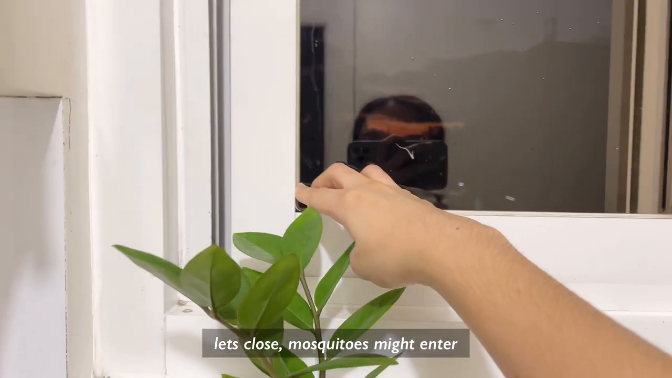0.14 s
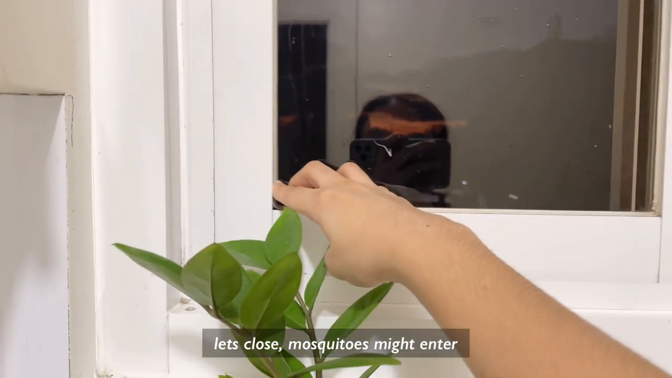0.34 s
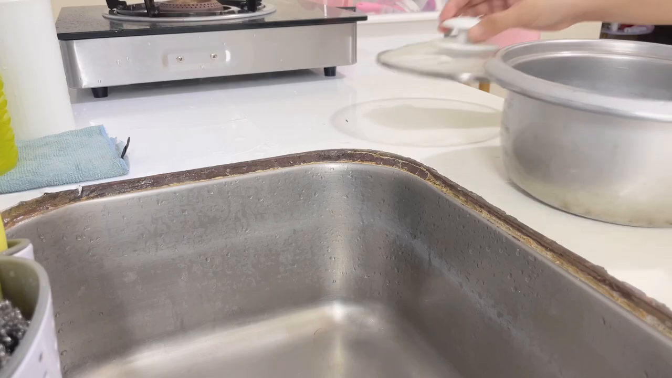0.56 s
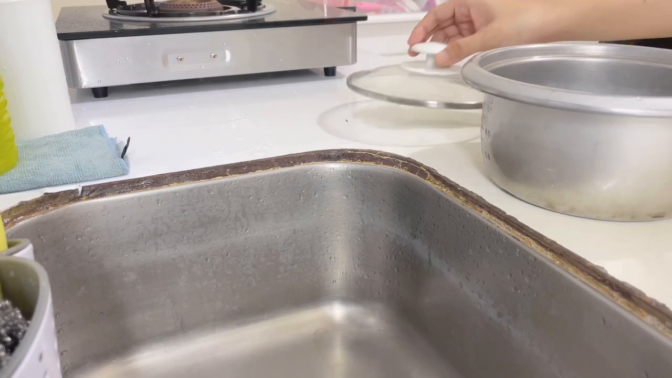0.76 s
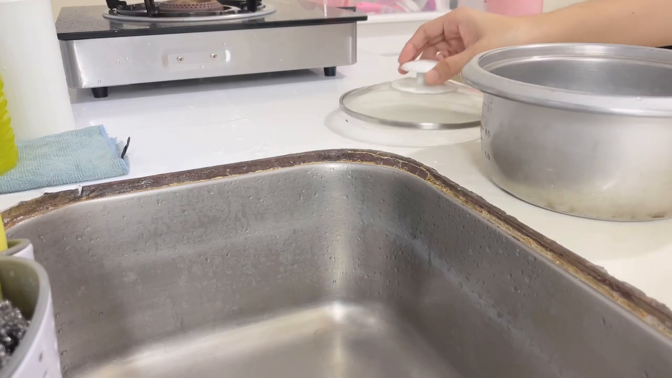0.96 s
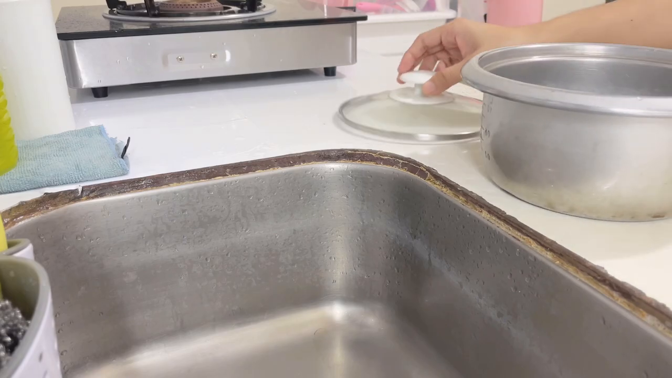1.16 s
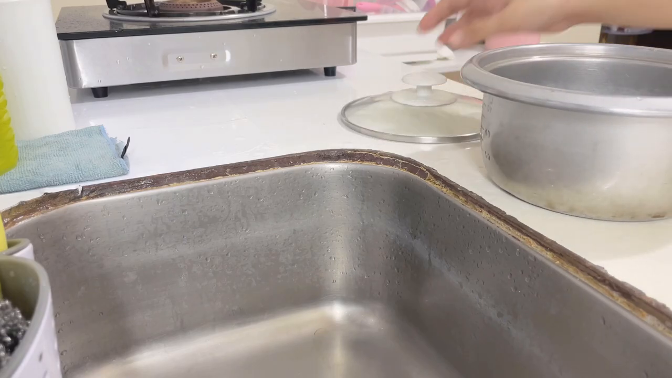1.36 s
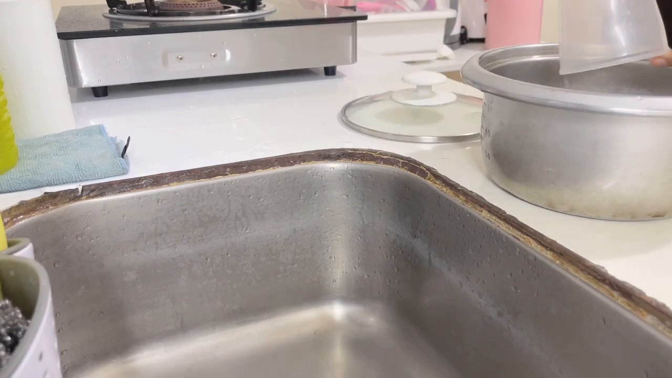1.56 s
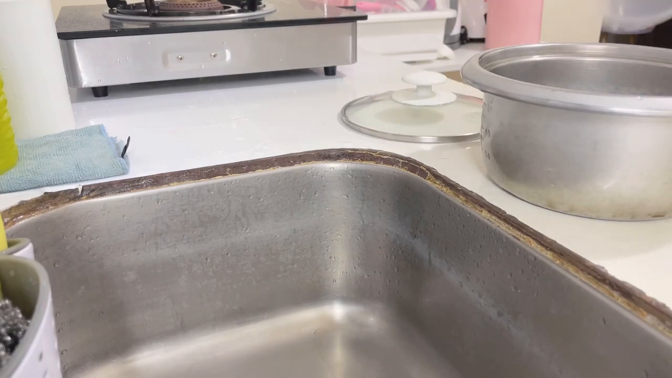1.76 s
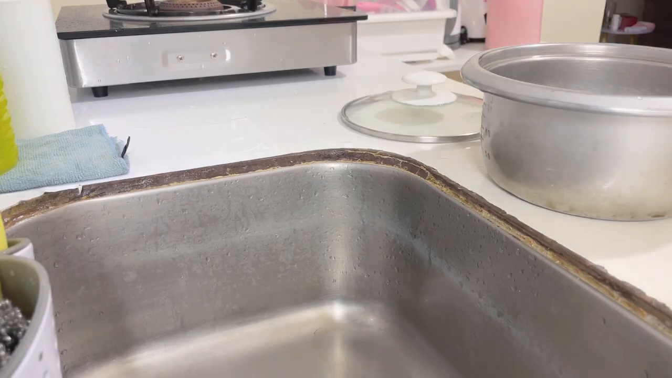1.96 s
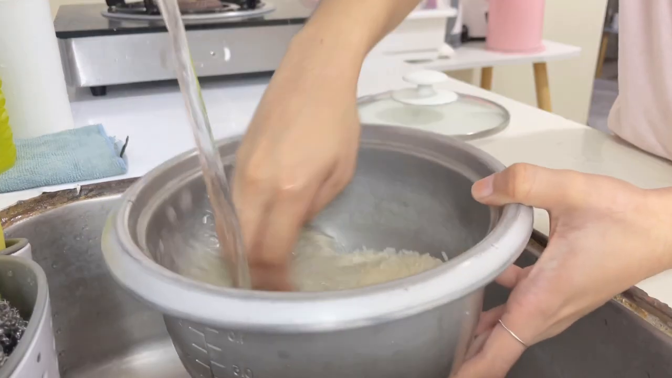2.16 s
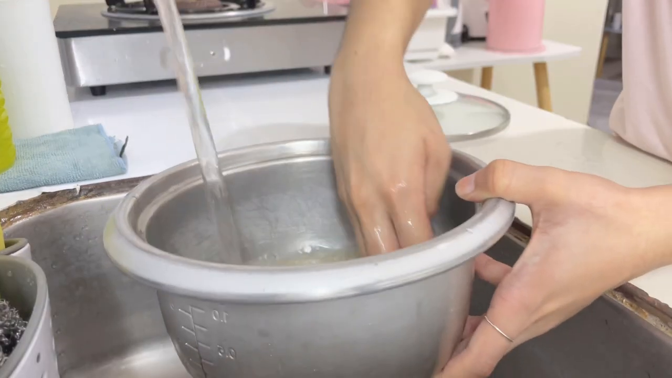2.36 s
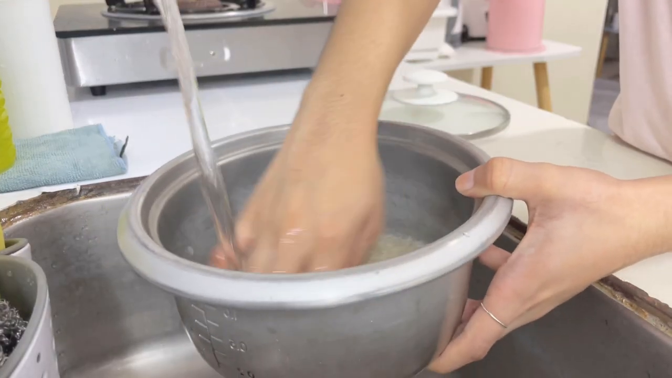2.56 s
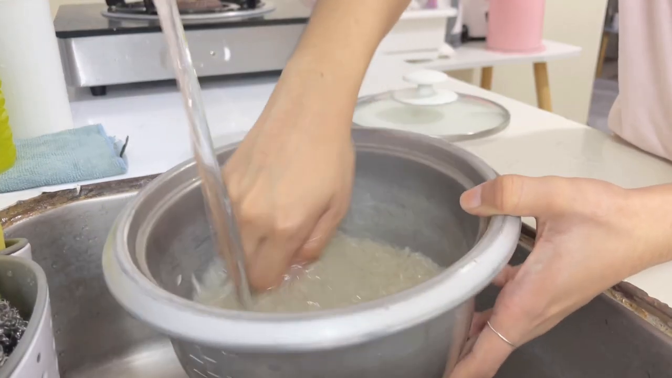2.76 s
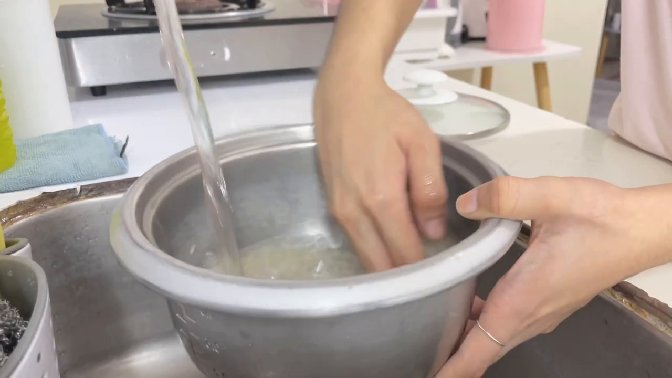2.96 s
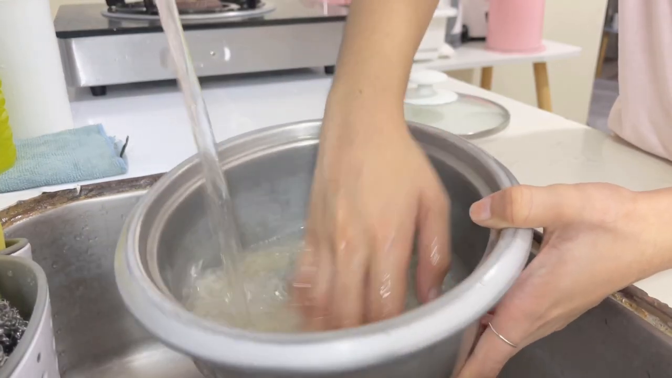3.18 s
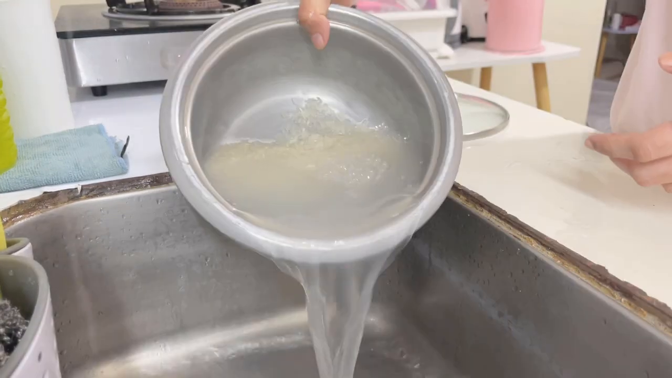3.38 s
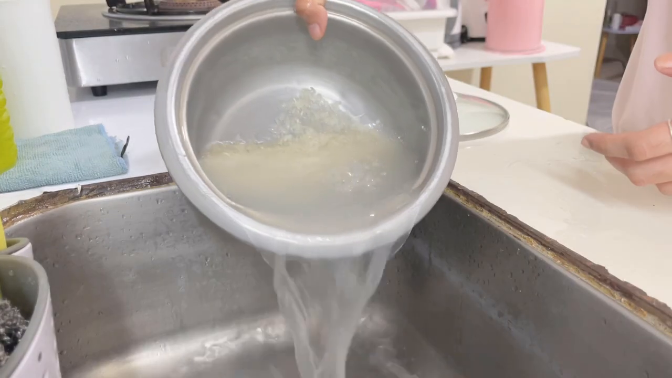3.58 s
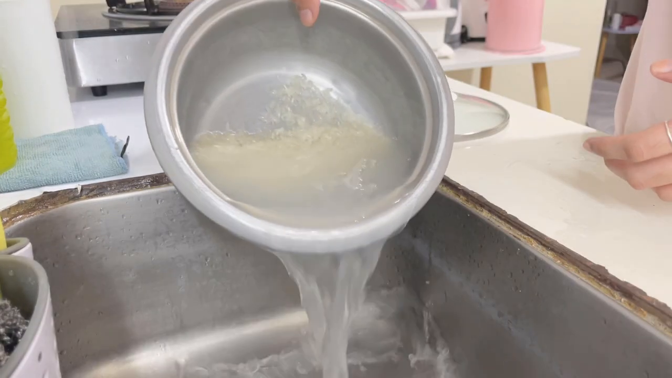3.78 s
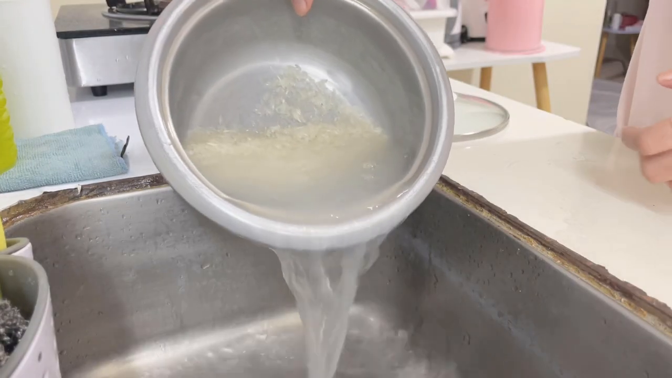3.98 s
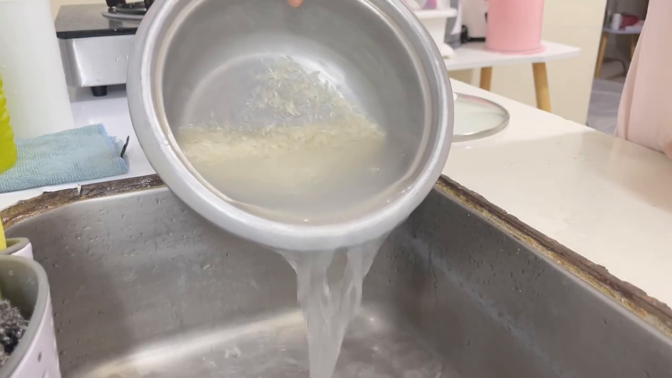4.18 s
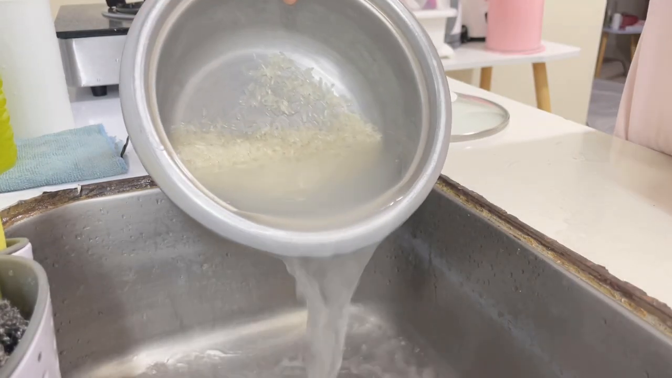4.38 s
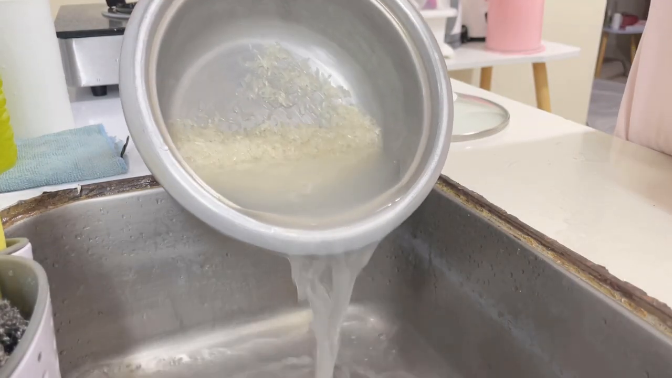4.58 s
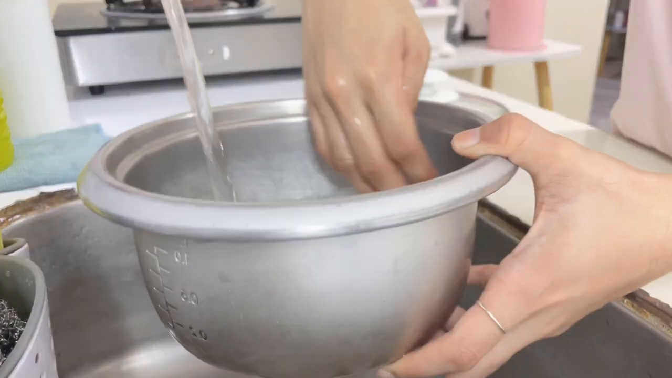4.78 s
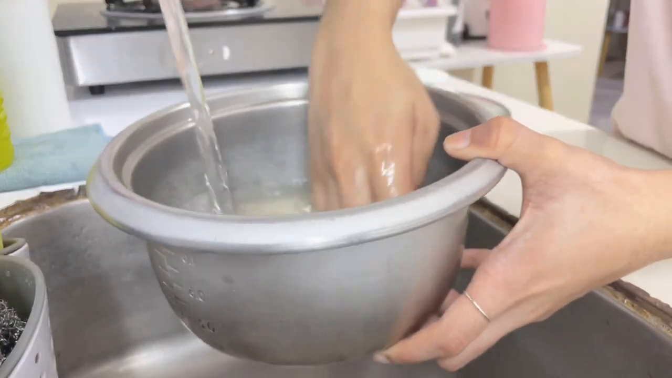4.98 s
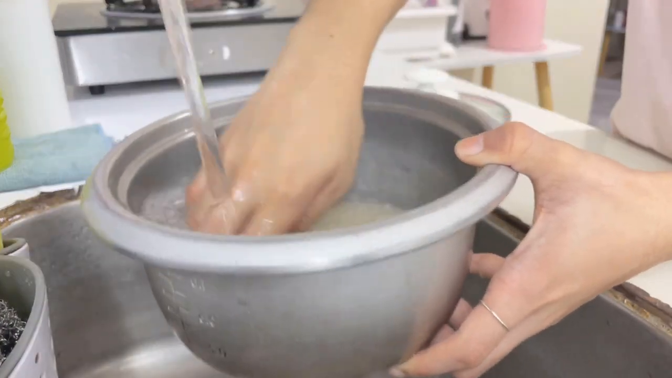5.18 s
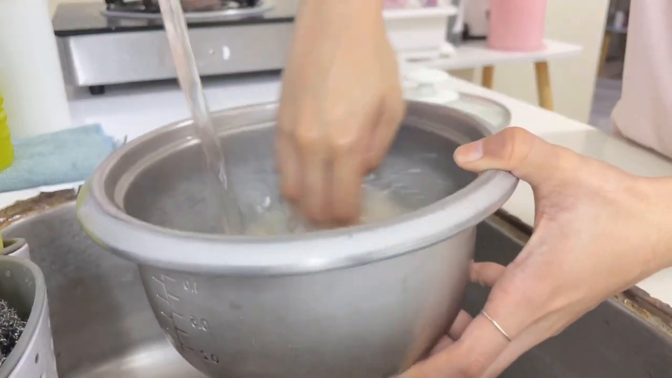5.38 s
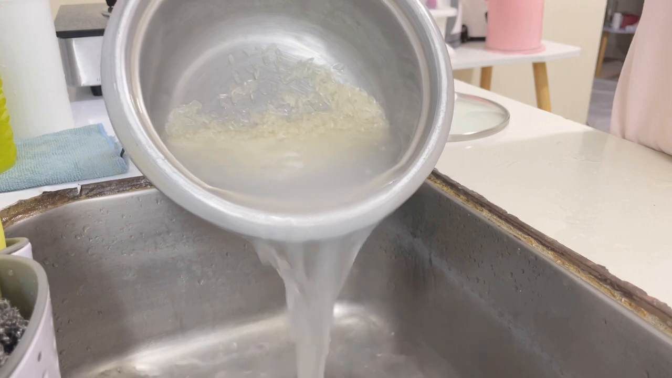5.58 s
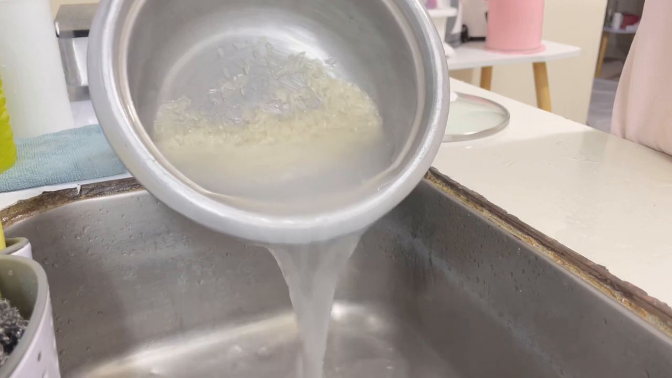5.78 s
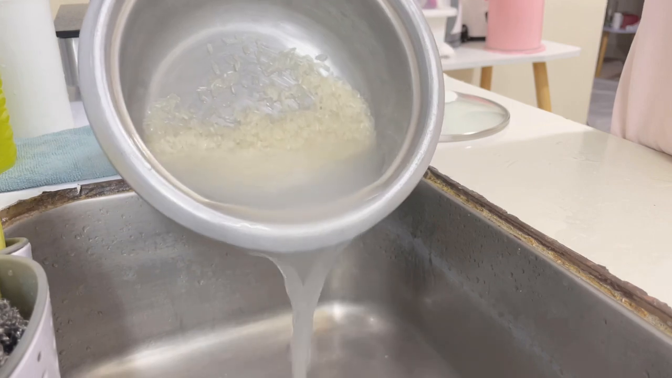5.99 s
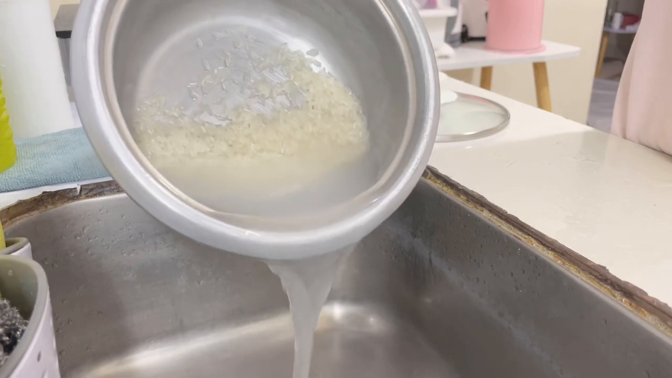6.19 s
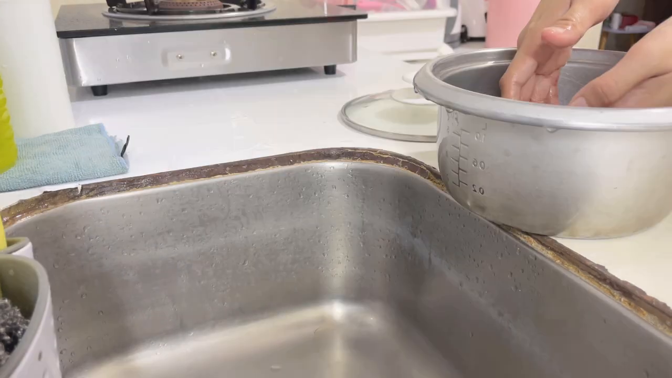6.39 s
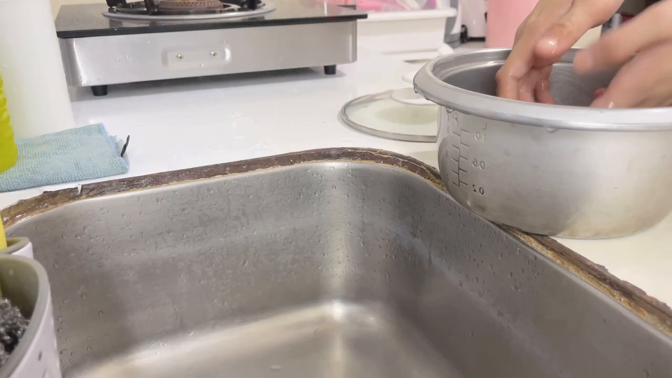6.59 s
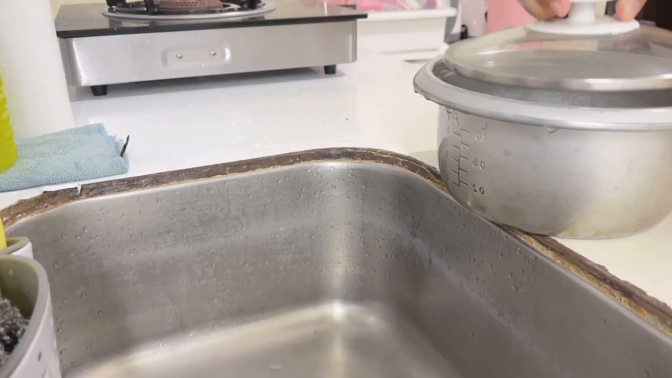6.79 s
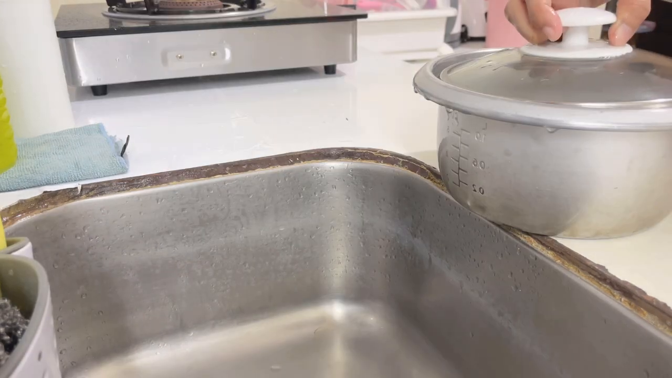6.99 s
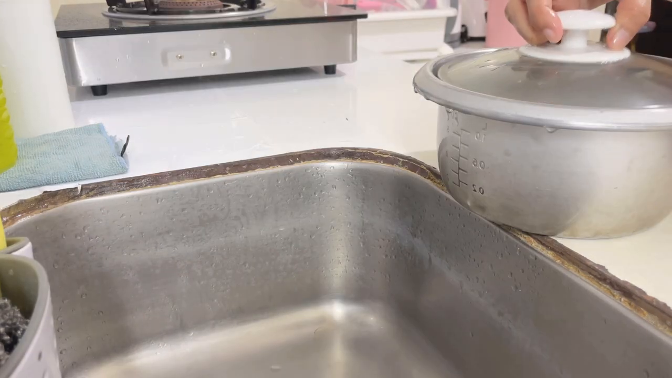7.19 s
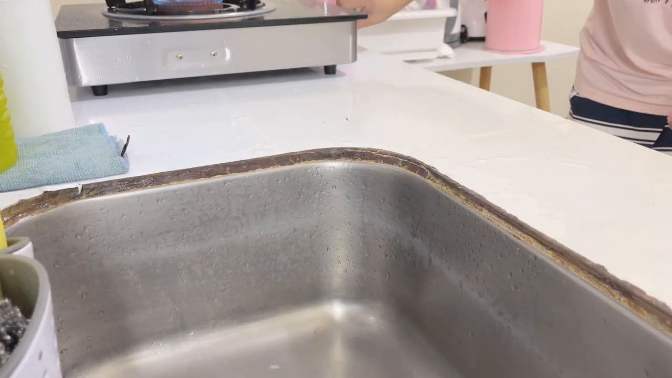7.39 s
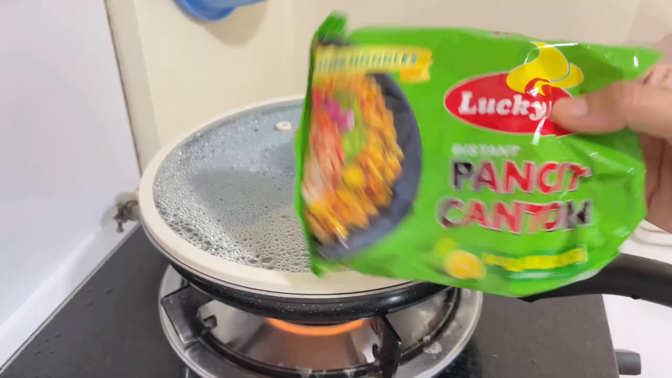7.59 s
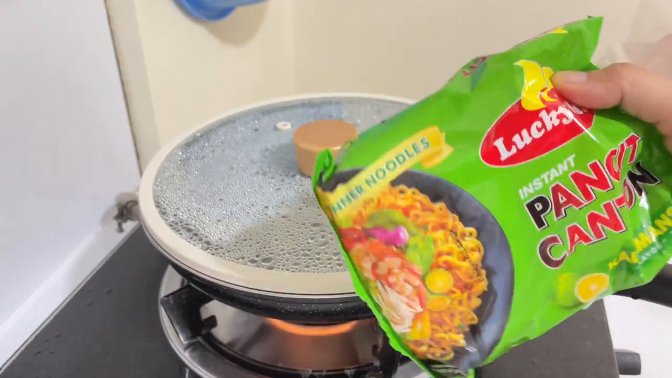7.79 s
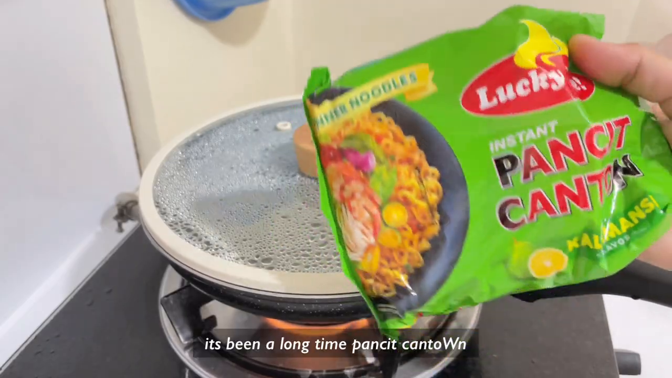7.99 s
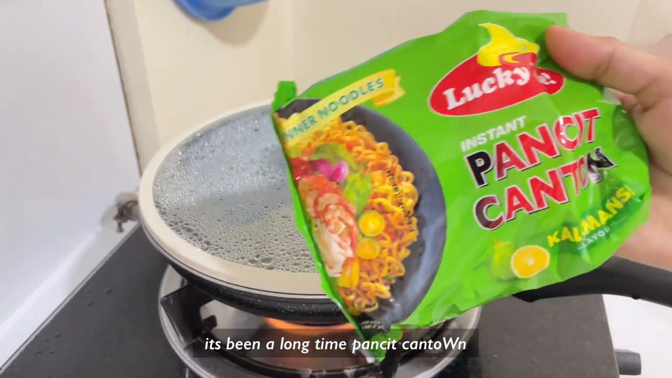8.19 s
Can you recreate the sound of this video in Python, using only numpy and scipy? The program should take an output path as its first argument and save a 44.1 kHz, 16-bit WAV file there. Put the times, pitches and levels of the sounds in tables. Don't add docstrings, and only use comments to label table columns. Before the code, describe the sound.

In a small kitchen, heard close in stereo with abrupt cuts, a window slides and knocks shut. A glass lid clinks off a pot and lands on the counter, and dry rice rushes into metal. A tap hisses while a hand swishes the grains; cloudy water pours into a steel sink. Washing and pouring repeat, the drain gurgling. After a quiet moment the lid clanks back on, and a stiff plastic packet crackles.

```python
import sys
import numpy as np
from scipy import signal
from scipy.fft import rfft, irfft, next_fast_len
from scipy.io import wavfile
from scipy.ndimage import uniform_filter1d

SR = 44100
rng = np.random.default_rng(int(sys.argv[2]) if len(sys.argv) > 2 else 0)


def unload_audio(sound):
    columns = np.transpose(np.atleast_2d(sound))
    steps = np.round(np.clip(columns, -1, 1) * 32767)
    wavfile.write(sys.argv[1], SR, steps.astype(np.int16))


def how_loud(loudness_db):
    steps = np.asarray(loudness_db, float) / 20
    return 10 ** steps


N = 363825
T = np.arange(N) / SR

CUTS_S = [
    0,
    .543,
    1.443,
    2.010,
    3.343,
    4.645,
    5.465,
    6.410,
    6.886,
    7.575,
]
ROOM_DB = [-32, -34, -34.5, -41.5, -31, -28, -29, -33.5, -34, -34.5]

# frequency in Hz, density in dB per Hz.
ROOM_TONE = [(45, -24), (65, 9.5), (100, -1.5), (700, -13.5), (1500, -14.5), (3000, -25.5), (5500, -35.5),
             (16000, -48)]
# frequency in Hz, density in dB per Hz.
SLIDE_TONE = [(200, 1), (900, -11), (2500, -10), (5000, -17), (7000, -14.5), (10000, -12.5), (14000, -24),
              (16000, -22)]
# frequency in Hz, density in dB per Hz.
RICE_TONE = [(1000, -11), (2500, -12), (5000, -15.5), (9000, -3.5), (14000, -13.5), (16000, -15)]
# frequency in Hz, density in dB per Hz.
JET_TONE = [(3000, -73), (6000, -3), (9300, 4.5), (11000, -3), (13700, 1.5), (16000, -9.5)]
# frequency in Hz, density in dB per Hz.
SWISH_TONE = [(150, -66), (400, -3.5), (1000, -2.5), (2500, -1), (5000, 0), (8000, -9), (12000, -4.5)]
# frequency in Hz, density in dB per Hz.
SPLASH_TONE = [(400, -27), (1000, -35), (2500, 16.5), (5000, 12.5), (7000, -14), (12000, -2.5)]
# frequency in Hz, density in dB per Hz.
TICK_TONE = [(1500, -30), (2500, 6.5), (4500, 12.5), (6500, -2), (10000, -14)]
# frequency in Hz, density in dB per Hz.
SPRAY_TONE = [(4000, -19), (7000, 6), (9500, 7), (13500, -4), (16000, -3)]
# frequency in Hz, density in dB per Hz.
PLASTIC_TONE = [(200, 0.5), (800, 7), (2000, 4), (4500, 0), (7000, -7.5), (10000, -6), (14000, -12),
                (16000, -14)]
# frequency in Hz, density in dB per Hz.
SNAP_TONE = [(600, -9), (1500, 4), (4000, 4.5), (6500, -4), (10000, -10)]

# frequency in Hz, width in Hz, level in dB.
POT_AIR = [(515, 60, -6.5), (702, 23, 0.5), (747, 55, -2), (1060, 42, -3.5), (1300, 320, -8.5),
           (1500, 96, -25), (1900, 76, -20), (2240, 98, -7)]
# frequency in Hz, width in Hz, level in dB.
POT_WALL = [(235.4, 22, -10), (375, 4.6, 1)]
# frequency in Hz, width in Hz, level in dB.
DRAIN = [(1070, 70, 0), (1400, 50, -5), (1570, 70, -2), (1880, 40, -8), (2400, 60, -5), (2800, 300, -1),
         (3400, 200, -7), (4600, 350, -4)]
# frequency in Hz, width in Hz, level in dB.
BASIN = [(116.7, 25, 5.5), (176.6, 13.7, 5.5), (226.5, 32, 5), (270.5, 13.5, -8), (329, 5.5, -35),
         (351, 9, -4.5), (500, 14, -10)]
# frequency in Hz, width in Hz, level in dB.
FLOOR_PANEL = [(68, 7.2, 0)]

# frequency in Hz, level in dB, decay time T60 in seconds.
FRAME = [(110, 0.5, 0.21), (180, -27, 0.14), (380, -1, 0.037), (580, -11, 0.036), (1330, -15.5, 0.073),
         (1900, -21, .04), (2480, -13.5, 0.024)]
# frequency in Hz, level in dB, T60 in seconds.
GLASS = [(264, -2.5, 0.019), (484, -1, 0.042), (680, 7, 0.078), (726, -20, 0.18), (800, -9, 0.1),
         (1001, -7, 0.17), (1520, -12.5, 0.13), (2410, -26, 0.16)]
# frequency in Hz, level in dB, T60 in seconds.
RIM = [(190, -1, 0.11), (453, 4, 0.029), (873, -1, 0.11), (1900, -17.5, 0.35), (4600, -23, 0.05)]
# frequency in Hz, level in dB, T60 in seconds.
COUNTER = [(179.3, -8.5, 0.29), (263, -1.5, 0.11), (398, -5, 0.22), (521, 4, 0.086), (590, 5, 0.13),
           (692, 2, 0.14), (856, -4, 0.097), (1680, -12.5, 0.16), (1900, -14, 0.17), (2920, -19, 0.18),
           (3930, -25, 0.23), (4900, -25, 0.15)]
# frequency in Hz, level in dB, T60 in seconds.
POT = [(181.5, -1.5, 0.36), (247, -6.5, 0.16), (411, -2.5, 0.26), (993, -2.5, 0.059), (1367, -7.5, 0.2),
       (1930, -1.5, 0.064), (2480, -13.5, 0.22), (2830, -10, 0.1), (3420, -12.5, 0.13), (4250, -20, 0.27),
       (6700, -25, .12)]
# frequency in Hz, level in dB, T60 in seconds.
CLOSED_POT = [(117, -8, 0.67), (190, 1, 0.16), (253.4, 3.5, 0.096), (540, -7.5, 0.17), (1108, 0, 0.1),
              (1160, -0.5, 0.12), (1860, -10, 0.35), (2550, -8.5, 0.41), (3420, -10.5, 0.24),
              (4430, -18, 0.37), (6500, -22, 0.29)]
# frequency in Hz, level in dB, T60 in seconds.
SLOSH = [(114, -10, 0.11), (178, -5, 0.13), (246, -6, 0.059), (345, -23, 0.073)]

# start in seconds, peak in dB, crack in dB, freedom to ring (1 = modes decay at
WINDOW_HITS = [
    (0.312, -10.5, -18, 0.77),
    (0.33, -18, -26, 0.47),
    (0.37, -21, -26, 0.87),
    (0.396, -17.5, -4.5, 0.98),
]
# start in seconds, peak in dB, crack in dB, freedom to ring.
GLASS_HITS = [
    (0.544, -5.5, -26, 1),
    (0.572, -8.5, -22, 0.91),
    (0.618, -11, -23, 0.45),
]
# start in seconds, peak in dB, crack in dB, freedom to ring.
RIM_HITS = [
    (1.119, -0.43, -18.5, 0.85),
    (1.162, -2.5, -24, 0.41),
]
# start in seconds, peak in dB, crack in dB, freedom to ring.
COUNTER_HITS = [
    (1.177, -4.5, -41, 0.82),
    (1.191, 2, -11.5, 0.34),
    (1.197, 6, -30, 1.0),
    (1.218, 2.5, -35, 1.0),
    (1.234, -5.5, -9, 0.42),
]
# start in seconds, peak in dB, crack in dB, freedom to ring.
POT_HITS = [
    (6.809, -29, -4, 1.0),
    (6.888, 2, -1.5, 0.92),
    (6.929, -5, -11, 0.48),
    (6.967, 2.5, 0, 0.92),
    (6.984, -33, 2.5, 1.0),
    (7.094, -16.5, -10, 0.7),
]
# start in seconds, peak in dB, crack in dB,
# freedom to ring.
SEAT_HITS = [
    (7.159, -15.5, -1, 1.7),
    (7.177, -11, -8.5, 1.6),
    (7.19, 6, -10, 0.85),
    (7.209, -1, -5, 1.04),
    (7.239, -31, -9, 0.56),
    (7.279, -13.5, -8, 1.9),
    (7.378, -24, 8, 3.4),
]
# start in seconds, peak in dB, crack in dB, freedom to ring.
SLOSHES = [
    (3.419, -36, -25, 0.32),
    (5.466, -7, -12, 0.69),
    (5.488, -5.5, -25, 0.68),
    (5.524, -6, -32, 0.85),
]
# start in seconds, peak in dB, frequency in Hz, T60 in seconds.
THUMPS = [(0.322, -11, 91, 0.16), (0.366, -12, 116, 0.16), (0.39, -19, 100, 0.13), (0.408, -12.5, 84, 0.17),
          (0.625, -18, 590, .15), (0.655, -17.5, 605, 0.14), (0.626, -30, 2410, 0.14),
          (3.421, -11.5, 379, 0.14), (3.465, -17.5, 373, 0.37), (3.925, -15.5, 300, 0.063),
          (6.965, -17, 95.5, 0.18), (6.888, -20.5, 1980, 0.1), (6.925, -8, 411, 0.18),
          (6.968, -4.5, 258, 0.19), (7.092, -14, 247, 0.2), (7.19, -9.5, 267, 0.12),
          (7.19, -4.5, 980, 0.087), (7.2, -9, 559.5, 0.21), (7.275, -20, 263, 0.14),
          (5.515, -12, 178, 0.078), (5.27, -17.5, 340, 0.33), (7.373, -19.5, 145, 0.32),
          (7.38, -25, 199, 0.28), (1.119, -24, 4420, 0.066), (1.162, -7.5, 873, 0.2),
          (1.193, -15, 4830, .035), (1.199, 1, 593, 0.1), (1.221, -14, 560, 0.09), (1.243, -5, 408, 0.14),
          (1.28, -28.5, 2930, 0.13), (1.234, -15, 4900, 0.043), (1.234, -8, 1790, .06),
          (6.888, -7.5, 405, 0.34), (6.888, -15.5, 1380, 0.25), (6.918, -18.5, 2850, .3),
          (6.973, -12.5, 2528, .29), (6.975, -14, 2900, 0.12), (6.888, -5, 2080, 0.07),
          (6.968, -3.5, 1076, 0.067), (2.98, -12, 690, 0.17), (7.279, -16, 1170, .08)]

# start in seconds, end in seconds, jet hiss in dB, rice swish in dB, sink drumming in dB.
TAP_TAKES = [
    (2.009, 3.342, -27, -24.5, -38),
    (4.641, 5.48, -28, -25.5, -26),
]
# start in seconds, length in seconds, effort from 0 to 1.
STROKES = [(2.204, 0.18, 0.87), (2.447, 0.099, 0.99), (2.594, 0.018, .45), (2.786, 0.13, 0.73),
           (2.904, 0.16, 0.94), (3.128, 0.17, 0.84), (4.63, 0.318, 0.82), (5.03, 0.1, 0.97),
           (5.181, 0.14, 0.91), (5.36, 0.12, 0.68)]
# start in seconds, end in seconds, floor boom in dB, basin drumming in dB, drift in dB per second.
POUR_TAKES = [
    (3.336, 4.65, -26.5, -27.5, 4),
    (5.466, 6.401, -23, -21.5, -6),
]
# middle in seconds, half length in seconds, depth in dB.
LULLS = [(3.363, 0.013, 3), (3.527, 0.055, 9), (4.106, 0.054, 9), (4.5, 0.088, 5.5), (4.612, 0.015, 8),
         (5.84, 0.026, 3.5), (6.18, 0.072, 2.5)]
# start in seconds, peak in dB, frequency in Hz.
BUBBLES = [(3.377, -5.5, 1760), (3.455, -13, 4600), (3.502, -18, 4660), (3.527, -18, 1920),
           (3.553, -23, 1550), (3.591, -8.5, 1520), (3.635, -11.5, 1860), (3.69, -13.5, 2500),
           (3.758, -11, 4440), (3.784, -11, 2480), (3.866, -19, 2920), (3.931, -15, 2310),
           (3.967, -17, 1320), (3.985, -19, 2340), (4.014, -15, 4780), (4.065, -16.5, 880),
           (4.166, -8, 2310), (4.19, -27, 2000), (4.232, -13, 2400), (4.25, -18, 3330), (4.271, -21, 2770),
           (4.299, -13, 3500), (4.317, -12, 2900), (4.327, -20, 1570), (4.338, -15, 1860),
           (4.378, -12, 3240), (4.44, -13.5, 1085), (4.446, -12, 4050), (4.535, -14.5, 1850),
           (4.556, -14.5, 3160), (4.589, -14, 5180), (4.636, -14, 2060), (2.09, -11, 2240),
           (2.895, -9, 2240), (3.135, -9, 1240), (5.1, -6, 2740), (5.246, -7.5, 1900), (5.25, -11, 1500),
           (5.262, -3, 3070), (2.255, -11, 1610), (2.368, -11, 1510), (2.528, -11, 1034), (3.43, -15, 4300),
           (3.843, -8.5, 4330), (2.928, -9, 3900), (3.187, -7, 3620), (3.224, -4, 4500), (2.935, -10, 734)]
# start in seconds, peak in dB, frequency in Hz.
GURGLES = [(5.491, -4, 2800), (5.531, -18, 2780), (5.582, -9.5, 1090), (5.625, -7, 800), (5.661, -6, 1420),
           (5.689, -5, 2430), (5.71, -8, 1520), (5.724, -4.5, 1360), (5.76, -12, 1070), (5.834, -20, 1100),
           (5.853, -9, 2900), (5.872, -5, 2880), (5.87, -17.5, 1095), (5.912, -9, 2830), (5.914, -14, 1080),
           (5.943, -13, 2650), (5.968, -12, 1070), (5.992, -13, 2860), (6.011, -20, 2320),
           (6.075, -13, 1060), (6.118, -15, 1060), (6.15, -10, 2640), (6.187, -19, 1050),
           (6.225, -20, 2800), (6.31, -34, 1070), (6.332, -10, 2300), (6.352, -21, 1090), (6.359, -7, 3370),
           (6.375, -25, 1080), (6.39, 1, 4800), (6.4, -2, 3450), (5.466, -3, 5100), (5.545, -12, 2920),
           (5.572, -11, 1510), (5.602, -12, 4300), (5.658, -6, 2450), (5.703, -4, 2870), (5.778, -11, 2640),
           (6.022, -12, 2770), (6.047, -13, 2800), (6.064, -9, 2850), (6.097, -10, 1500),
           (6.126, -12, 4500), (6.195, -11, 4600), (6.234, -10, 2770), (6.242, -5, 4340),
           (6.341, -11, 2170)]
# start in seconds, peak in dB.
SPLATS = [(3.3207, -9.5), (3.3837, -14), (3.4206, -12), (3.66, -14), (3.7847, -18), (3.7972, -8),
          (3.8426, -20), (3.8645, -21), (5.625, -23), (4.3794, -13.5), (4.5372, -15.5), (5.1006, -21),
          (5.25, -10), (6.1744, -13), (6.3574, -17), (6.4018, -3.5)]
# start in seconds, peak in dB.
SPITS = [(3.3717, -18), (3.455, -23), (3.519, -20), (3.5508, -18), (3.5813, -28), (3.6411, -27),
         (3.662, -19), (3.7833, -13), (3.833, -13.5), (3.8676, -12), (3.901, -20), (3.9449, -19),
         (3.9998, -27), (4.0657, -24), (4.084, -17), (4.137, -25), (4.1555, -22), (4.1839, -16),
         (4.272, -18), (4.298, -15), (4.3785, -17), (4.3959, -20), (4.4408, -19), (4.537, -16.5),
         (4.5875, -16), (4.6234, -21), (5.5184, -11), (5.5523, -12), (5.6027, -20), (5.6221, -17),
         (5.669, -16), (5.7219, -16), (5.7508, -16), (5.7867, -12), (5.847, -22), (5.878, -19),
         (5.9633, -18), (6.0536, -12.5), (6.1265, -27), (6.1474, -15), (6.1734, -14), (6.219, -14),
         (6.3565, -29), (6.4018, -30)]
# start in seconds, peak in dB.
SNAPS = [(7.586, -18), (7.6456, -10), (7.656, -21), (7.672, -1), (7.688, -26), (7.7124, -7), (7.751, -5),
         (7.7788, -12), (7.789, -8), (7.728, -19), (7.8755, -2.5), (7.8844, -14), (7.9311, -5),
         (7.9422, -14), (7.705, -12), (7.9636, -5.5), (8.0144, -8.5), (8.0626, -7), (8.106, -12),
         (8.1545, -6.5), (8.175, -10), (8.1953, -9.5), (8.2038, -13)]
# middle in seconds, half length in seconds, hum in dB.
SHAKES = [
    (7.61, 0.012, -14.5),
    (7.76, 0.0096, -23),
    (8.02, 0.02, -27.5),
]

# frequency in Hz, likeness from 0 to 1, left minus right in dB.
PORTS = [(60, .99, 1.5), (140, .985, 3), (250, .88, 4.5), (600, .6, 2.5), (1500, .62, 2), (3500, .68, 4),
         (7000, .6, 2), (8200, .97, 0), (11500, .85, 0), (13300, .985, 0)]
# frequency in Hz, lead of the left in radians.
PORT_LEAD = [(0, 0), (400, .4), (700, -.8), (3500, .9), (5200, .7), (5900, -1.6), (8600, -3.14),
             (13300, -6.28)]


def unit(x):
    return x / np.sqrt(np.mean(x ** 2))


def during(start, end):
    return (T >= start) & (T <= end)


def tent(s, top_db, rise_db_s, fade_db_s):
    return top_db - np.where(T < s, rise_db_s * (s - T), fade_db_s * (T - s))


def colour(x, points):
    hz, db = np.transpose(points)
    f = np.log(np.fft.rfftfreq(len(x), 1 / SR) + 1)
    return irfft(rfft(x) * how_loud(np.interp(f, np.log(hz), db, left=-60)), len(x))


def ring(x, peaks):
    bands = [how_loud(db) * signal.lfilter(*signal.iirpeak(hz, hz / width, SR), x) for hz, width, db in peaks]
    return unit(sum(bands))


def walk(rate, size=N):
    k = int(SR / rate)
    steps = np.repeat(rng.standard_normal(size // k + 1), k)
    return 2.82 * uniform_filter1d(uniform_filter1d(steps, k), k)[:size]


def grains(rate, spread_db, tail_ms, bed_db):
    sizes = how_loud(spread_db * np.minimum(rng.exponential(size=N), 3.5))
    hits = (rng.random(N) < rate / SR) * sizes
    puffs = signal.lfilter([1], [1, -np.exp(-1000 / (tail_ms * SR))], hits)
    return (unit(puffs) + how_loud(bed_db)) * rng.standard_normal(N)


def add(out, s, x):
    i = int(s * SR)
    out[i:i + len(x)] += x[:N - i]


def strike(hits, modes, vary_db, contact_ms, tail_db, tail_s):
    out, t = np.zeros(N), T[:SR // 2]
    hz, db, t60 = np.transpose(modes)[:, :, None]
    rattle_tone = [(m[0], m[1]) for m in modes] + [(9000, -45.0)]
    for s, peak_db, crack_db, free in hits:
        mix, noise = rng.standard_normal((2, len(modes), 1)), rng.standard_normal((2, len(t)))
        decay = np.exp(-6.9 * t / t60 / free)
        tones = np.sin(2 * np.pi * hz * (1 + 0.0075 * mix[1]) * t)
        body = np.sum(how_loud(db + vary_db * mix[0]) * decay * tones, 0)
        body += how_loud(tail_db) * unit(colour(noise[0], rattle_tone)) * np.exp(-6.9 * t / tail_s / free)
        body *= 1 - np.exp(-1000 * t / contact_ms)
        crack = colour(noise[1], [(1000, 0.5), (3000, -13.5), (7000, -11), (16000, -22.0)])
        crack = unit(crack) * (np.exp(-t / 0.0033) + 0.3 * np.exp(-t / 0.041 / free)) / 2
        add(out, s, how_loud(peak_db) * (body / np.max(np.abs(body)) + how_loud(crack_db) * crack))
    return out


def clicks(events, low, high, high_db, tail_ms):
    out, t = np.zeros(N), T[:1024]
    for s, peak_db in events:
        noise = rng.standard_normal(len(t))
        burst = unit(colour(noise, low)) + how_loud(high_db) * unit(colour(noise, high))
        add(out, s, how_loud(peak_db + 2.0) * burst * np.exp(-1000 * t / tail_ms))
    return out


def bubbles(events, cycles, rise=3.8):
    out = np.zeros(N)
    for s, peak_db, hz in events:
        turns = hz * T[:int(7 * cycles / hz * SR)]
        fade = np.exp(-turns / cycles) * (1 - np.exp(-turns / rise))
        tone = np.sin(2 * np.pi * turns * (0.953 + 0.032 * turns / cycles))
        add(out, s, how_loud(peak_db - 1.0) * fade * tone)
    return out


def fizz(count, low_hz, high_hz):
    u = rng.random((count, 3))
    start_s = u[:, 0] * (T[-1] - .1)
    peak_db = 3.0 * np.minimum(-np.log(u[:, 1]), 3)
    hz = low_hz * (high_hz / low_hz) ** u[:, 2]
    return unit(bubbles(np.c_[start_s, peak_db, hz], cycles=5.1))


def room():
    take = np.searchsorted(CUTS_S, T, side="right") - 1
    drift = how_loud(.8 * walk(6))
    return unit(colour(rng.standard_normal(N), ROOM_TONE)) * how_loud(np.array(ROOM_DB)[take]) * drift


def window():
    rub = unit(colour(grains(1000, 2.1, 1.4, 0), SLIDE_TONE)) * how_loud(7.5 + 0.27 * walk(42))
    jerk = how_loud(-36.5 - 214 * T)
    glide = how_loud(tent(0.28, -43.5, 0, 95))
    return rub * (jerk + glide) * during(0, CUTS_S[1]) + strike(WINDOW_HITS, FRAME, 3.9, 0.9, 0, 0.16)


def thumps():
    out, t = np.zeros(N), T[:SR // 4]
    for s, peak_db, hz, t60 in THUMPS:
        swell = 1 - np.exp(-t * hz * 6.8)
        add(out, s, how_loud(peak_db - 2.0) * np.exp(-6.9 * t / t60) * swell * np.sin(2 * np.pi * hz * t))
    return out


def lid():
    off = strike(GLASS_HITS, GLASS, 0.9, 1.6, -14.5, 0.82)
    down = strike(RIM_HITS, RIM, 4.0, 0.93, 1.0, 0.16) + strike(COUNTER_HITS, COUNTER, 4.3, 1.0, -4.0, 0.52)
    back = strike(POT_HITS, POT, 3.6, 1.0, -8.5, 0.51)
    seated = strike(SEAT_HITS, CLOSED_POT, 1.5, 0.53, 0.0, 0.38)
    return off + down + back + seated


def rice():
    rush_s, fade_db_s = 1.547, 150
    rush = how_loud(-22 + np.minimum(tent(rush_s, 1, 400, fade_db_s), 0))
    trickle = how_loud(tent(rush_s, -30.5, 0, fade_db_s))
    patter = unit(colour(grains(4000, 2.5, 0.44, 5.4), RICE_TONE)) * how_loud(7.5 + 0.4 * walk(57.6))
    bright = signal.sosfilt(signal.butter(N=4, Wn=8500, btype="high", fs=SR, output="sos"), patter)
    return (trickle * patter + rush * bright) * during(CUTS_S[2], CUTS_S[3])


def sink(peaks):
    lumps = grains(90, 2.0, 12, 2)
    return ring(ring(lumps, peaks), [(hz, 3 * width, 0) for hz, width, db in peaks])


def tap():
    edge_s = 0.053
    strokes = [e * np.interp(T, [s - edge_s, s, s + d, s + d + edge_s], [0, 1, 1, 0]) for s, d, e in STROKES]
    effort = np.max(strokes, 0)
    jet, swish, drum = sum(how_loud(np.array(dbs)[:, None]) * during(a, b) for a, b, *dbs in TAP_TAKES)
    flowing = drum > 0
    spurt = how_loud(8.5 * np.exp(-np.abs(T - TAP_TAKES[0][0]) / 0.067))
    jet = jet * spurt * how_loud(3 * effort)
    swish = swish * spurt * how_loud(1.5 * effort)
    air = how_loud(-41 + 20 * effort) * flowing
    stir = grains(1200, 3.0, 1.5, 0) * how_loud(.8 * walk(25))
    hiss = unit(colour(grains(2600, 9.0, 1.0, 1.3), JET_TONE)) * how_loud(6.5 + 0.86 * walk(43))
    wash = unit(colour(stir, SWISH_TONE)) * how_loud(3.0) + how_loud(-7.0) * fizz(count=3000, low_hz=950, high_hz=4050)
    pot_air = ring(ring(grains(220, 2.7, 7.2, -1.2), POT_AIR), [(743, 290, 0.5), (1590, 3300, -2.5)])
    pot = air * pot_air + how_loud(-39.5) * flowing * ring(stir, POT_WALL)
    basin = drum * sink(FLOOR_PANEL) + how_loud(-40.5) * flowing * sink(BASIN)
    return jet * hiss + swish * wash + pot + basin


def pour():
    thin = how_loud(-sum(db * np.exp(-((T - s) / half) ** 4) for s, half, db in LULLS))
    spans = np.array([during(a, b) for a, b, *_ in POUR_TAKES])
    splash, spray, drain = (how_loud(dbs) @ spans for dbs in ([-31, -26.5], [-32.5, -31], [-9.5, -2.5]))
    boom, drum = sum(how_loud(np.array([[low_db], [db]]) + drift * np.clip(T - a, 0, b - a)) * during(a, b)
                     for a, b, low_db, db, drift in POUR_TAKES)
    slaps = grains(300, 0.99, 0.7, 2.0) * how_loud(2.0 * walk(70))
    wet = unit(colour(slaps, SPLASH_TONE)) * how_loud(-3.0) + how_loud(-6.0) * fizz(count=1800, low_hz=1420, high_hz=5750)
    drain = drain * np.where((T > POUR_TAKES[1][0]) & (T < 5), 0.3, 1)
    wet += drain * ring(grains(300, 2.5, 3, -5), DRAIN)
    wet += drain * how_loud(-3.5) * fizz(count=2200, low_hz=1090, high_hz=3550)
    drops = how_loud(-1.0) * clicks(SPLATS, TICK_TONE, SPRAY_TONE, -9, 2.7)
    drops += how_loud(-0.5) * clicks(SPITS, JET_TONE, TICK_TONE, -19, 3.7)
    air = bubbles(BUBBLES, cycles=8.8, rise=0.94) + how_loud(-1.5) * bubbles(GURGLES, cycles=7.5, rise=0.9)
    events = air + drops + strike(SLOSHES, SLOSH, 0.75, 3.6, -16, 0.096)
    mist = unit(colour(slaps + 1.3 * rng.standard_normal(N), SPRAY_TONE)) * how_loud(4.5)
    sheet = splash * wet + spray * mist
    return thin ** 0.63 * boom * sink(FLOOR_PANEL) + drum * sink(BASIN) + thin * sheet + events


def packet():
    held = during(CUTS_S[-1], T[-1])
    grip = how_loud(-20.5 + tent(7.653, 0, 115, 13))
    film = grains(1500, 6.5, 0.75, 0) * held
    rustle = unit(colour(film, PLASTIC_TONE)) * how_loud(-9.5)
    crackle = unit(colour(film, SPRAY_TONE)) * how_loud(-4.5 - 16.5)
    bag_hz = 385 * (1 + 0.0157 * walk(25))
    bag = np.sin(2 * np.pi * np.cumsum(bag_hz) / SR) * how_loud(1.0 + 1.1 * walk(28))
    hum = 0
    for k, (s, half, db) in enumerate(SHAKES):
        edge_db_s = 166 if k else 895
        hum = hum + how_loud(db - edge_db_s * np.maximum(np.abs(T - s) - half, 0))
    return held * (grip * (rustle + crackle) + hum * bag) + clicks(SNAPS, SNAP_TONE, JET_TONE, -4.5, 1.04)


def ports(x):
    walls_t60_s, opposed = 0.072, .45
    size = next_fast_len(len(x) + SR // 2)
    f, t = np.fft.rfftfreq(size, 1 / SR), T[:SR // 4]
    hz, *columns = np.transpose(PORTS)
    like, pan_db = (np.interp(f, hz, c) for c in columns)
    lead = np.interp(f, *np.transpose(PORT_LEAD))
    paths = rng.standard_normal((3, 2, len(t))) * np.exp(-6.9 * t / walls_t60_s)
    paths[:, 1] = np.sqrt(1 - opposed ** 2) * paths[:, 1] - opposed * paths[:, 0]
    paths = rfft(paths / np.sqrt(np.sum(paths ** 2, 2, keepdims=True)), size)
    shares = np.array([walk(14, size=len(x)) for _ in range(3)])
    shares = shares / np.sqrt(np.sum(shares ** 2, 0))
    echo = np.sum(rfft(x * shares, size)[:, None] * paths, 0)
    side = np.array([[.5], [-.5]])
    direct = np.exp(1j * side * lead) * rfft(x, size)
    heard = np.sqrt(like) * direct + np.sqrt(1 - like) * echo
    return irfft(heard * how_loud(side * pan_db), size)[:, :len(x)]


def scene():
    mono = room() + window() + thumps() + lid() + rice() + tap() + pour() + packet()
    takes = np.split(mono, (np.array(CUTS_S[1:]) * SR).astype(int))
    return np.concatenate([ports(take) for take in takes], axis=1)


def top_cut(x):
    return signal.sosfilt(signal.butter(12, 16370, fs=SR, output="sos"), x)


def record(dry):
    heard = signal.sosfilt(signal.butter(2, 40, "high", fs=SR, output="sos"), dry)
    top = signal.sosfilt(signal.ellip(8, .2, 60, 15800, fs=SR, output="sos"), heard)
    return top_cut(np.clip(top, -1, 1))


dry = scene()
out = record(dry)
unload_audio(out)
```